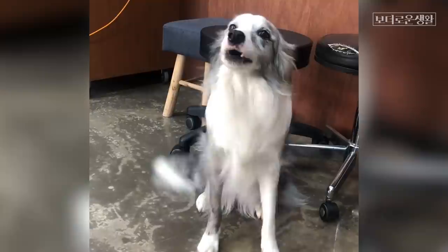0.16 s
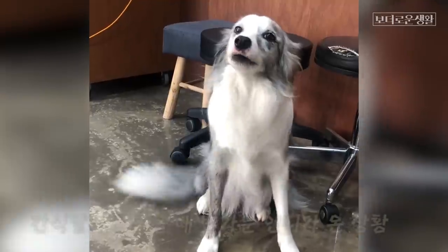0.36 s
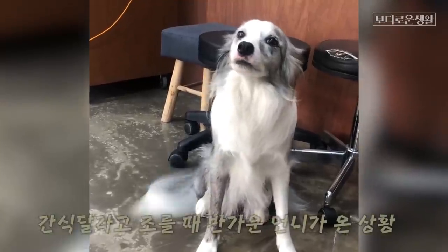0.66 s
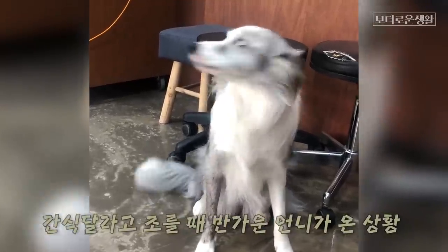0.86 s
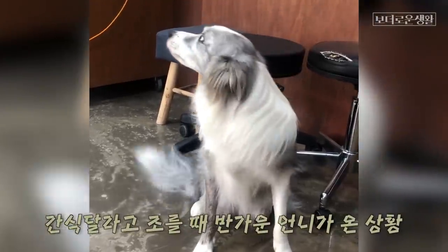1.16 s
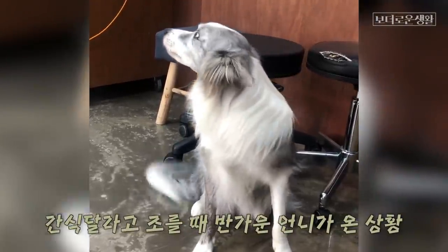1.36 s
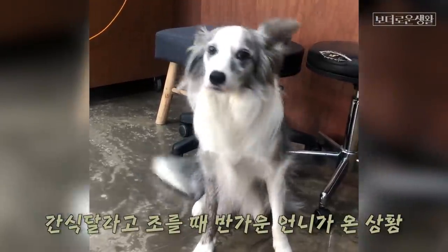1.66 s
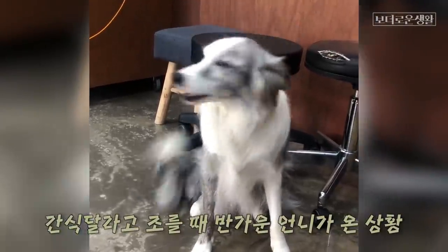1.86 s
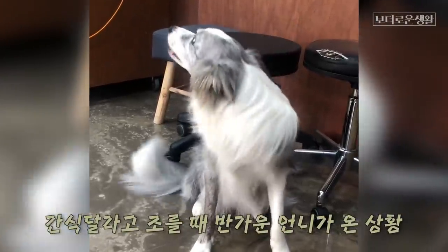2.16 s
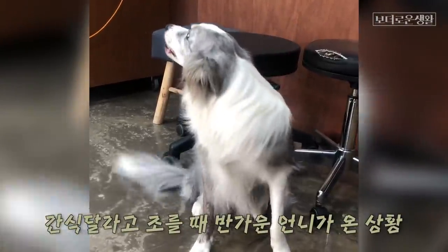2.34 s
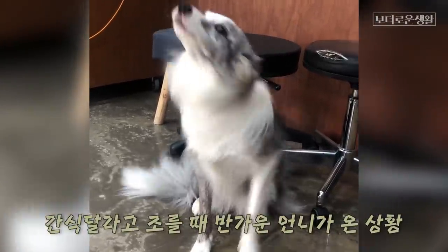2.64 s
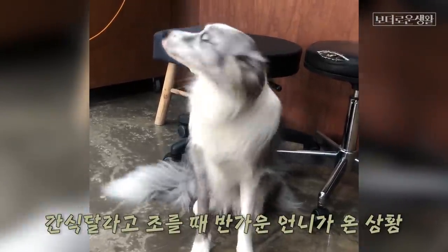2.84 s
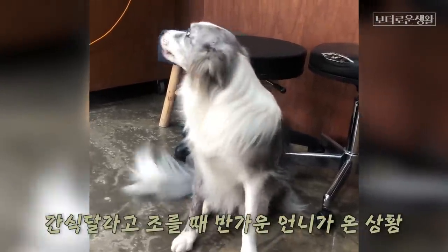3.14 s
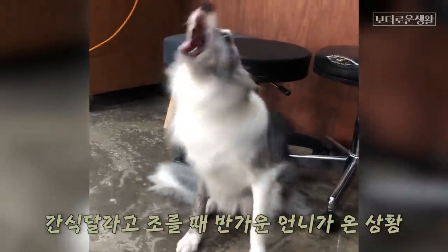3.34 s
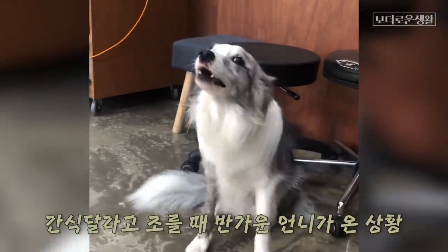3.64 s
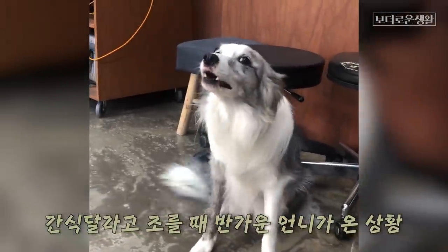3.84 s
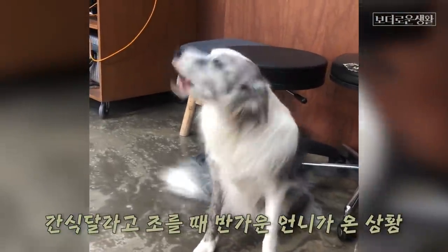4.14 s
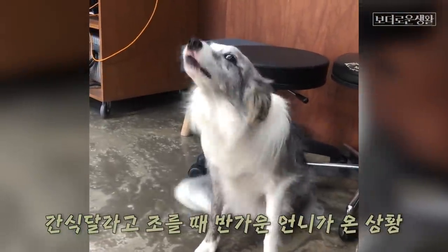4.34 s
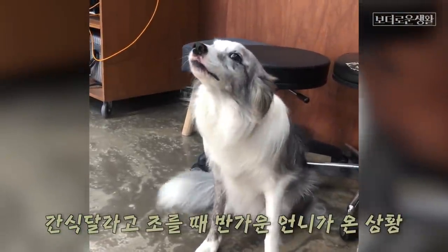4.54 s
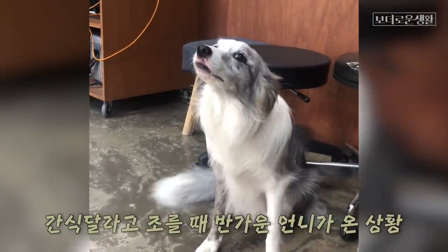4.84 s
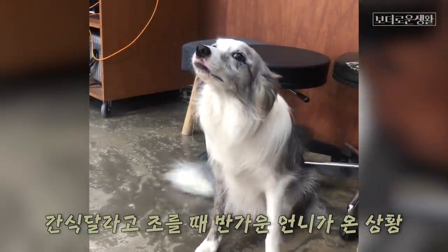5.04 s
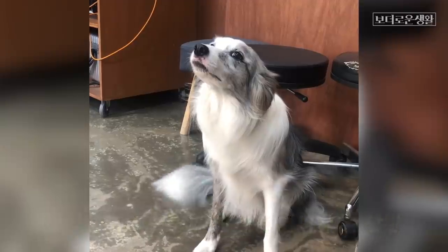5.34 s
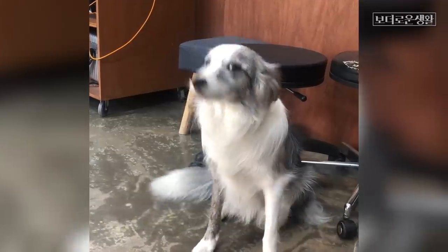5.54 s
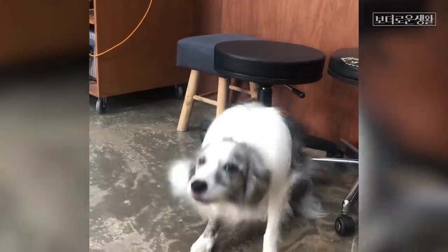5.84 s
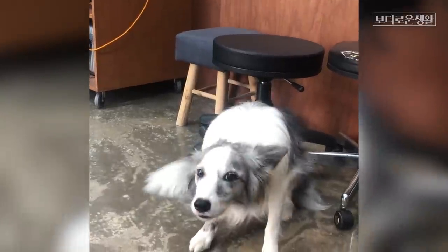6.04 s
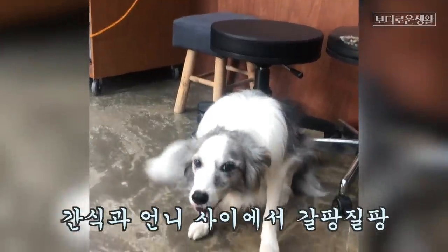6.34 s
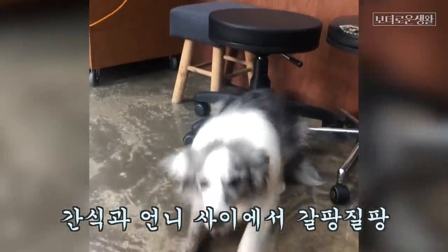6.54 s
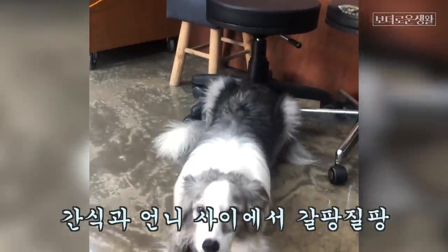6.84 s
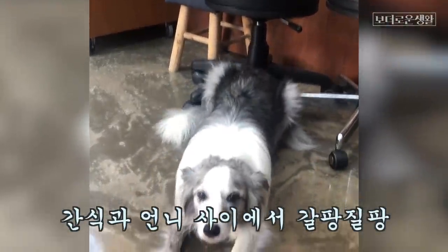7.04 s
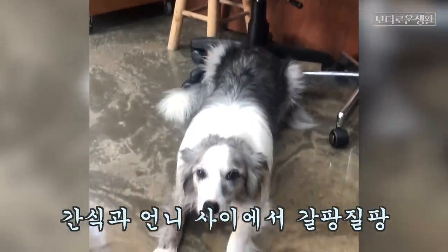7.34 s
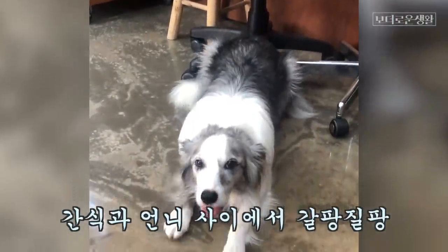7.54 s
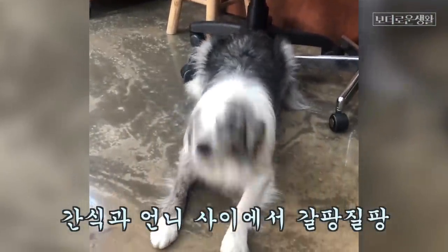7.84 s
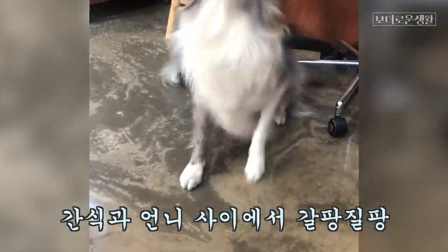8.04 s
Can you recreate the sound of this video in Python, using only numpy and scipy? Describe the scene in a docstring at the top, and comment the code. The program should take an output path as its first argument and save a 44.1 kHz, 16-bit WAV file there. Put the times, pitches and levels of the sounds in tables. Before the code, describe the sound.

Close indoors, a begging dog yelps sharply, whistles thinly through its nose, whimpers, pants and shuffles, then gives a low falling yowl.

```python
"""A room with a hard floor: an excited dog begs close to a phone.
Vocal folds (rough harmonics plus turbulent air) give barks, whines, shut-mouth whimpers and six yelps;
a near-pure whistle, mostly 4-6 kHz, sounds with or between them. Noise bursts make the clicks of jaws
and claws and the panting; decaying low tones make the paw thuds. Shaped noise makes shuffling and hush.
The room rings after each sound; the phone's limiter flattens the loudest peaks."""
import sys
import numpy as np
from scipy import signal
from scipy.fft import rfft, irfft, next_fast_len
from scipy.io import wavfile
from scipy.ndimage import uniform_filter1d, minimum_filter1d, map_coordinates

SR = 44100
rng = np.random.default_rng(int(sys.argv[2]) if len(sys.argv) > 2 else 0)


def transcribe(signal):
    """Save signal, clipped to [-1, 1], as a 16-bit WAV file at the path in sys.argv[1]."""
    frames = np.atleast_2d(signal).T
    limited = np.clip(frames, -1, 1)
    pcm = np.round(limited * 32767).astype(np.int16)
    wavfile.write(sys.argv[1], SR, pcm)


N = 361302

# Low shuffling: t/s, level/dB before trim
SHUFFLE_LEVEL = [(0.0, -65), (0.54, -64.5), (0.95, -57), (2.01, -56.5), (2.55, -70), (3.09, -60.5),
                 (3.34, -51), (3.74, -59.5), (4.06, -54), (4.71, -67), (6.11, -52.5), (6.5, -55),
                 (7.08, -69.5), (8.1, -62.5)]
# Shuffling spectrum: f/Hz, relative density/dB
SHUFFLE_COLOUR = [(20, -29.5), (70, -16), (150, -4), (240, -5), (400, -15.5), (1500, -23), (8000, -71)]
# Room hush spectrum: f/Hz, relative density/dB
HUSH_COLOUR = [(20, -33), (60, -6), (150, -3), (280, -8.5), (400, -15.5), (650, -9), (1200, -19),
               (3000, -18.5), (6000, -25), (15000, -43.5)]
# Barks, folds broken to about 1/2 or 1/3 of their pitch: t/s, length/s, pitch f/Hz, level/dB,
# overtone lift/dB, loudest at/0-1, roughness at end/0-1, dip of a coinciding yelp/dB
BARKS = [(0, 0.12, 504, -43, -9, 0.28, 0.28, 0), (2.114, 0.045, 714, -29, -16, .4, 0.2, 3.5),
         (2.631, 0.054, 465.6, -13, 3, 0.7, 0.01, 7), (3.429, 0.056, 636.7, -4.5, 8.5, .45, 0.29, 9),
         (4.268, .068, 649.2, -4.5, -2.5, .38, .6, 21), (4.283, .026, 780.3, -4.5, -9.5, 0.43, .7, 0.5),
         (6.689, .034, 728.3, -8.5, 8.5, 0.7, .7, 8), (8.168, 0.078, 576.3, -8, -26, .5, 0.71, 0)]
# Bark mouth response: f/Hz, gain/dB
BARK_MOUTH = [(300, -52), (480, -27), (620, -21), (740, -6), (900, -10), (1300, -3.5), (1600, -7.5),
              (1900, 2), (2400, -9.5), (3000, -15), (3800, -16.5), (5000, -37.5), (7200, -30.5),
              (9700, -37.5), (15000, -46.5)]
# Short open-mouth whines: t/s, length/s, start f/Hz, turn f/Hz, end f/Hz, turn at/0-1, loudest at/0-1,
# level/dB, overtone lift/dB, roughness/0-1
WHINES = [(0, .098, 979.6, 1013, 974, 0.45, 0.05, -27.5, 10.5, 0.34),
          (.099, .043, 1054, 1038, 935, 0.48, 0.24, -19.5, -5.5, 0.13),
          (2.76, 0.056, 537.5, 485, 481, 0.98, .15, -30.5, 0, .08),
          (4, 0.036, 1063, 1060, 1018, 0.78, 0.25, -42.5, 2.5, 0.13),
          (4.175, 0.064, 1037, 1078, 1027, 0.96, .7, -42.5, 6, 0.078),
          (5.946, 0.018, 1263, 1092, 850, 0.57, 0.4, -18, -12, 0.12),
          (7.668, .025, 951, 914, 1017, 0.397, 0.73, -24, 14, .2),
          (7.69, 0.034, 1120, 1013, 1150, 0.65, 0.18, -29.5, 10.5, .08)]
# Long yowl, sinking overall: t/s, pitch f/Hz, level/dB, overtone lift/dB before YOWL_LIFT_DB
YOWL = [(7.855, 905, -38, -10), (7.895, 870, -34.5, -12), (7.913, 1045, -22.5, -18),
        (7.935, 822.3, -13.5, 4), (7.955, 904, -12, -1.5), (7.973, 846, -18, -22), (7.989, 846.5, -11, -5),
        (7.999, 792.5, -18.5, -24), (8.009, 624, -16, -26), (8.029, 613, -15.5, -25),
        (8.041, 588.7, -19.5, -16.5), (8.117, 559, -13, -17), (8.139, 602.8, -16, -22.5),
        (8.17, 667, -7.5, -23)]
# Open-mouth whine response: f/Hz, gain/dB
WHINE_MOUTH = [(250, -43), (580, 3.5), (850, -3.5), (1200, -7.5), (1750, -3.5), (2050, -11), (2550, -13),
               (2850, -30.5), (3150, -18.5), (3550, -29.5), (4400, -46), (5400, -47.5), (6300, -28),
               (10000, -31.5), (15000, -71.5)]
# Short whistles: t/s, length/s, start f/Hz, turn f/Hz, end f/Hz, turn at/0-1, loudest at/0-1,
# level/dB, overtone lift/dB
WHISTLES = [(.095, .135, 4180, 4075, 3983, 0.34, .42, -23, -15),
            (.945, 0.041, 5570, 6030, 5560, 0.44, 0.6, -43.5, -3),
            (1.522, .16, 4600, 5000, 3880, .22, 0.71, -31.5, -6),
            (2.572, 0.044, 4760, 4950, 5500, 0.4, 0.52, -39, -15),
            (2.738, 0.048, 5180, 4370, 3740, 0.23, 0.68, -34.5, 9),
            (2.778, .31, 3838, 3930, 3650, 0.9, 0.8, -43, -9),
            (3.545, .17, 3930, 3996, 3970, 0.64, 0.1, -31.5, -12.5),
            (4.415, .225, 3942, 4010, 3720, 0.52, 0.03, -32, -15.5),
            (5.385, 0.074, 12960, 13100, 13200, .5, .5, -61, -20),
            (5.495, .135, 4270, 4960, 4150, .55, .68, -40, -7),
            (5.98, 0.051, 4360, 4200, 3710, .4, 0.2, -32.5, -13.5),
            (6.405, 0.04, 4510, 4740, 4830, .45, 0.62, -52, -23),
            (6.615, 0.016, 4980, 5330, 5400, .7, 0.7, -24, -28),
            (6.715, 0.041, 5500, 5500, 4820, .35, 0.7, -29, -6),
            (7.725, .135, 6120, 4530, 5160, 0.54, 0.6, -33.5, 3)]
# Long whistle, stepping down: t/s, pitch f/Hz, level/dB before trim
LONG_WHISTLE = [(0.988, 6500, -51), (0.996, 6640, -39), (1.014, 5100, -36), (1.028, 5320, -34),
                (1.072, 4440, -39.5), (1.096, 4660, -30.5), (1.146, 4390, -36), (1.18, 4700, -29.5),
                (1.216, 4190, -32), (1.26, 3890, -41.5)]
# Whistle mouth response: f/Hz, gain/dB
WHISTLE_MOUTH = [(3700, -6.5), (5500, -0.5), (8000, -13.5), (10000, -20), (12000, -26), (14000, -28.5),
                 (15500, -42)]
# Jaw and claw clicks: t/s, level/dB before trim
CLICKS = [(0.366, -38), (1.714, -22), (1.921, -22), (3.159, -19), (3.311, -23.5), (3.858, -26.5),
          (4.035, -20)]
# Click spectrum: f/Hz, relative level/dB
CLICK_COLOUR = [(80, -33), (300, 3), (900, -1), (2000, -8), (5000, -14.5), (9000, -27.5), (15000, -35.5)]
# Paws landing: t/s, pitch f/Hz, level/dB
PAWS = [(2.145, 172, -33), (5.939, 192, -39.5), (5.984, 161, -24), (6.03, 128, -37), (6.8, 129, -39)]
# Shut-mouth whimpers: same columns as WHINES
WHIMPERS = [(1.495, 0.14, 711, 788, 752, 0.48, 0.53, -29.5, -5.5, 0.01),
            (1.782, 0.057, 715, 695, 713, 0.5, 0.36, -22, -16, 0),
            (1.945, 0.11, 745.6, 760.5, 790, 0.9, 0.1, -22, -17.5, 0)]
# Closed-lip response: f/Hz, gain/dB
SHUT_MOUTH = [(250, -17), (720, -4), (1500, -3), (2200, -27), (3000, -35), (3800, -18), (5000, -33),
              (9000, -9), (15000, -56.5)]
# Panting puffs: t/s, length/s, level/dB, mouth resonance f/Hz
PUFFS = [(1.716, .085, -34, 1507), (1.913, 0.013, -47, 1500), (3.121, 0.19, -49, 890),
         (3.262, 0.15, -47, 2882), (3.829, 0.059, -43, 1100), (3.993, 0.2, -44, 1883),
         (6.39, 0.25, -44.5, 2275)]
# Puff spectrum at the muzzle: f/Hz, relative level/dB
MUZZLE = [(150, -8.5), (600, -11), (1200, -10), (2000, -9), (2750, -18), (3300, -7), (4500, -19),
          (6000, -23), (8500, -31.5), (15000, -37.5)]
# Yelps: t/s, length/s, start f/Hz, top f/Hz, end f/Hz, pitch time constant/s, swell time constant/s,
# level/dB, fade/dB, overtone lift/dB, roughness at start/0-1, roughness once settled/0-1
YELPS = [(1.998, 0.15, 1033, 1444, 1374, 0.015, .01, 1.5, 21.5, 2.5, 0.5, 0.03),
         (2.59, 0.14, 1667, 1390, 1397, 0.0051, 0.019, 1.5, 12.5, -1, 0, 0),
         (3.384, 0.12, 1145, 1425, 1371, .035, 0.0032, -5.5, 2, 3, 0.05, 0.06),
         (4.233, 0.13, 1359, 1443, 1282, .025, 0.0026, -3, 8, 0, .05, 0.09),
         (5.82, 0.12, 1148, 1444, 1177, 0.02, 0.0064, -2.5, 11.5, 14, .55, 0.14),
         (6.624, .142, 1214, 1400, 1286, .036, 0.0059, 1.5, 14.5, -7, .05, .08)]
# Yelp mouth response: f/Hz, gain/dB
YELP_MOUTH = [(300, -45), (700, -25.5), (1050, -7), (1400, 5), (2000, -2.5), (2750, -13), (4100, -30),
              (5500, -30.5), (7000, -37), (8300, -50), (9700, -31), (11200, -39.5), (13000, -47.5),
              (15500, -67.5)]
# Hiss of air in the nose: f/Hz, relative level/dB
NOSE = [(1000, -19.5), (3500, -11.5), (5200, -11.5), (7000, -6), (9000, -12.5), (11500, -17.5),
        (15000, -29.5)]
# Share of the overtone lift each region gets: f/Hz, share/1
PRESS = [(1200, 0.92), (2800, 0.93), (4200, 1), (9000, 0.51)]
# Muzzle direction: t/s, gain above BEAM_HZ/dB
FACING = [(0, 5.5), (1, 4), (4.9, -1.5), (5.7, 11), (6.9, 8), (7.6, 0)]
# Room decay, apart from the early boost: f/Hz, t60/s
ROOM_T60 = [(120, .35), (500, 0.78), (1300, 0.71), (2800, 0.83), (4200, 0.63), (8000, .45), (14000, .3)]
# Room level against the direct sound: f/Hz, gain/dB
ROOM_GAIN = [(150, -14), (700, -8), (1400, -6), (2800, -12.5), (4200, -7.5), (9000, -8.5), (15000, -26.5)]

TOP_HZ = 15700  # band limit of voices and phone
ATTACK_S = 0.0031  # opening and closing of every call
BEND = 1.5  # glide shape: 1 straight, 2 parabola
CALM_HISS = 0.1  # nose hiss of a clean call, on the roughness scale
BARK_EDGE_DB, BARK_DROOP = 2, 0.032  # loss of level and share of pitch at onset; 0.88 of it at the end
WHINE_EDGE_DB, WHIMPER_EDGE_DB, WHISTLE_EDGE_DB = 8.5, 10, 13.5  # level loss at both ends
YOWL_LIFT_DB, YOWL_ROUGH = 17, 0.1
WHISTLE_BRIGHTEN_DB = 4  # overtone growth, start to end
LONG_WHISTLE_LIFT_DB, LONG_WHISTLE_TRIM_DB = 0, 0.5
SWELL_DB = 26  # a yelp starts this far down
SAG_POWER, FADE_POWER = 3.5, 4.6  # higher: pitch, level give way later
END_ROUGH = .28  # yelp roughness as the breath runs out
STRAIN_DB, STRAIN_S = 13, 0.0056  # overtone growth around a break
BREAK_ROUGH, BREAK_S = 0.22, 0.012  # roughness added within a break; time to break
BEAM_HZ = 8000  # the beam narrows above this


def amp(db):
    """Decibels to gain."""
    return 10 ** (np.asarray(db) / 20)


def unit(x):
    """Scale to rms 1."""
    return x / np.sqrt(np.mean(x ** 2) + 1e-20)


def along(points, hz):
    """Read (Hz, value) points on a log axis."""
    f, v = np.transpose(points)
    return np.interp(np.log(hz + 1), np.log(f + 1), v)


def wobble(size, rate):
    """A smooth random curve with rate knots a second."""
    return map_coordinates(rng.standard_normal(int(size * rate / SR) + 4), [np.arange(size) * rate / SR])


def filtered(x, response):
    """x times a response of frequency."""
    m = next_fast_len(len(x) + 8192)
    return irfft(rfft(x, m) * response(np.fft.rfftfreq(m, 1 / SR)), m)[:len(x)]


def noise(size, colour):
    """Noise of rms 1 with the given (Hz, dB) colour."""
    return unit(filtered(rng.standard_normal(size), lambda hz: amp(along(colour, hz))))


def add(track, s, sound):
    """Mix a sound into the track from time s on."""
    part = track[max(round(s * SR), 0):][:len(sound)]
    part += sound[:len(part)]


def shuffling(trim_db=1, uneven_db=1.0):
    """Weight shifts and tail sweeps on the floor: soft, uneven low noise."""
    level_db = np.interp(np.arange(N) / SR, *np.transpose(SHUFFLE_LEVEL))
    return amp(level_db + trim_db + uneven_db * wobble(N, 10)) * noise(N, SHUFFLE_COLOUR)


def hush(level_db=-61.5):
    """Steady room air: stationary shaped noise."""
    return amp(level_db) * noise(N, HUSH_COLOUR)


def progress(length_s):
    """0 to 1 over a call, one value per sample."""
    return np.linspace(0, 1, max(int(length_s * SR), 64))


def arch(u, at, start, middle, end, bend):
    """Control moving from start to middle, reached at share at, then to end."""
    at = np.clip(at, .02, .98)
    before = (start - middle) * np.abs(1 - u / at) ** bend
    after = (end - middle) * np.abs((u - at) / (1 - at)) ** bend
    return middle + np.where(u < at, before, after)


def gate(size):
    """Soft sine-squared opening and closing of a call."""
    k = np.arange(size)
    edge_distance = np.minimum(k, k[::-1])
    return np.sin(np.pi / 2 * np.clip(edge_distance / (ATTACK_S * SR), 0, 1)) ** 2


def controls(rows):
    """Start time and smoothed per-sample controls of a long call."""
    s, *columns = np.transpose(rows)
    s = np.sort(s)
    t = np.arange(s[0], s[-1], 1 / SR)
    return [s[0]] + [uniform_filter1d(np.interp(t, s, column), size=256) for column in columns]


def glides(rows, edge_db):
    """Short calls: pitch bends through one turn while level swells and fades."""
    for s, length_s, start_hz, turn_hz, end_hz, turn_at, loudest_at, peak_db, *colour in rows:
        u = progress(length_s)
        pitch_hz = arch(u, turn_at, start_hz, turn_hz, end_hz, BEND)
        level_db = peak_db + arch(u, loudest_at, -edge_db, 0, -edge_db, 2.2)
        yield s, pitch_hz, level_db, *colour


def harmonics(pitch_hz, lift_db, mouth, flicker_db, count):
    """Harmonic tone of rms 1 shaped by the mouth; pressing harder lifts the overtones."""
    k = np.arange(1, count + 1)[:, None]
    hz = k * pitch_hz
    # jaw and tongue never rest: each overtone fades by itself, high ones most
    drift = np.minimum([wobble(len(pitch_hz), 70) for _ in k], .5)
    flicker = flicker_db * np.minimum(hz / 4000, 1) * drift
    overtone_db = (k > 1) * (lift_db * along(PRESS, hz) + flicker)
    gain = amp(along(mouth, hz) + overtone_db) * (hz < TOP_HZ)
    phase = 2 * np.pi * (k * np.cumsum(pitch_hz) / SR + rng.random((count, 1)))
    rms = np.sqrt(np.sum(gain ** 2, 0) / 2 + 1e-20)
    return np.sum(gain * np.sin(phase), 0) / rms


def folds(calls, mouth, jitter, lurch, shimmer_db, rasp, flicker_db, hiss_db, count):
    """Vocal folds: roughness shakes pitch and level and lets turbulent air through."""
    out = np.zeros(N)
    for s, pitch_hz, level_db, lift_db, rough in calls:
        n, rough = len(pitch_hz), np.clip(rough, 0, 1)
        # fast jitter, slower lurches, slight quiver even when clean
        shake = rough * (jitter * wobble(n, 450) + lurch * wobble(n, 109.1)) + 0.0039 * wobble(n, 80)
        pitch_hz = pitch_hz * (1 + shake)
        shimmer = amp(shimmer_db * rough * wobble(n, 350))
        tone = harmonics(pitch_hz, lift_db, mouth, flicker_db, count) * shimmer
        # escaping air pulses once a cycle
        pulse = 1 + 0.16 * np.cos(2 * np.pi * np.cumsum(pitch_hz) / SR)
        air = unit(noise(n, BARK_MOUTH) * pulse)
        share = np.clip(rasp * rough, 0, 1)
        hiss = (rough + CALM_HISS) * amp(hiss_db) * noise(n, NOSE)
        voice = np.sqrt(1 - share ** 2) * tone + share * air + hiss
        add(out, s, gate(n) * amp(level_db) * voice)
    return out


def bark_calls(first_rough_share=0.68):
    """Pitch and level rise and fall together; roughness grows throughout."""
    for s, length_s, top_hz, peak_db, lift_db, loudest_at, end_rough, _ in BARKS:
        u = progress(length_s)
        slack = arch(u, loudest_at, 1, 0, 0.88, 1.3)
        rough = end_rough * arch(u, loudest_at, first_rough_share, 0.88, 1, 0.84)
        yield s, top_hz * (1 - BARK_DROOP * slack), peak_db - BARK_EDGE_DB * slack, lift_db, rough


def barks():
    """Rough, low-pitched fold cycles through the bark mouth."""
    return folds(bark_calls(), BARK_MOUTH, jitter=.08, lurch=.1, shimmer_db=7, rasp=.55,
                 flicker_db=4, hiss_db=-26, count=28)


def whines():
    """Short whines and the long yowl: folds through an open mouth."""
    s, pitch_hz, level_db, treble_db = controls(YOWL)
    yowl = (s, pitch_hz, level_db, treble_db + YOWL_LIFT_DB, YOWL_ROUGH)
    calls = [*glides(WHINES, WHINE_EDGE_DB), yowl]
    return folds(calls, WHINE_MOUTH, jitter=.04, lurch=.05, shimmer_db=4, rasp=.35,
                 flicker_db=8, hiss_db=-17, count=24)


def whistles(waver=0.0066, flutter_db=3.5, hiss_db=-27):
    """Second voice: near-pure, slightly wavering whistle with a little hiss."""
    out = np.zeros(N)
    s, pitch_hz, level_db = controls(LONG_WHISTLE)
    long_call = (s, pitch_hz, level_db + LONG_WHISTLE_TRIM_DB, LONG_WHISTLE_LIFT_DB)
    for s, pitch_hz, level_db, lift_db in [long_call, *glides(WHISTLES, WHISTLE_EDGE_DB)]:
        n = len(pitch_hz)
        lift_db = lift_db + WHISTLE_BRIGHTEN_DB * np.linspace(-.5, .5, n)
        wavering_hz = pitch_hz * (1 + waver * wobble(n, 90))
        tone = harmonics(wavering_hz, lift_db, WHISTLE_MOUTH, flicker_db=1.0, count=3)
        level = amp(level_db + flutter_db * wobble(n, 80))
        add(out, s, gate(n) * level * (tone + amp(hiss_db) * noise(n, NOSE)))
    return out


def clicks(t60_s=0.045, trim_db=-10, rise_s=0.00076):
    """Jaws and claws: dry, fast-decaying noise bursts."""
    out, t = np.zeros(N), np.arange(SR // 4) / SR
    for s, level_db in CLICKS:
        envelope = amp(level_db + trim_db - 60 * t / t60_s) * (1 - np.exp(-t / rise_s))
        add(out, s, envelope * noise(len(t), CLICK_COLOUR))
    return out


def whimpers():
    """Folds behind closed lips."""
    return folds(glides(WHIMPERS, WHIMPER_EDGE_DB), SHUT_MOUTH, jitter=.06, lurch=.035, shimmer_db=2,
                 rasp=.3, flicker_db=8, hiss_db=-3, count=7)


def panting(width_hz=260, resonance_db=13):
    """Puffs of air through the muzzle, each coloured by the mouth's resonance."""
    out = np.zeros(N)
    for s, length_s, level_db, mouth_hz in PUFFS:
        n = int(length_s * SR)
        air = filtered(noise(n, MUZZLE),
                       lambda hz: amp(resonance_db / (1 + ((hz - mouth_hz) / width_hz) ** 2)))
        add(out, s, amp(level_db) * signal.windows.tukey(n, .9) * unit(air))
    return out


def yelp_calls(settled_at=.4):
    """Pitch moves fast to the top, holds and sags; a yelp strains around a bark and gives way to it."""
    for (s, length_s, start_hz, top_hz, end_hz, rise_s, swell_s, peak_db, fade_db, lift_db,
         first_rough, settled_rough) in YELPS:
        u = progress(length_s)
        t = u * length_s
        pitch_hz = top_hz + (start_hz - top_hz) * np.exp(-t / rise_s) + (end_hz - top_hz) * u ** SAG_POWER
        level_db = peak_db - SWELL_DB * np.exp(-t / swell_s) - fade_db * u ** FADE_POWER
        rough = arch(u, settled_at, first_rough, settled_rough, END_ROUGH, bend=5.2)
        for bark_s, bark_length_s, *_, dip_db in BARKS:
            # seconds inside the bark, negative outside
            inside_s = np.minimum(s + t - bark_s, bark_s + bark_length_s - s - t)
            broken = np.clip(inside_s / BREAK_S, 0, 1)
            level_db = level_db - dip_db * broken
            rough = rough + BREAK_ROUGH * broken
            lift_db = lift_db + STRAIN_DB * np.exp(np.minimum(inside_s, 0) / STRAIN_S)
        yield s, pitch_hz, level_db, lift_db, rough


def yelps():
    """Piercing, high-pitched fold cycles through the yelp mouth."""
    return folds(yelp_calls(), YELP_MOUTH, jitter=.08, lurch=.05, shimmer_db=6, rasp=.7,
                 flicker_db=5, hiss_db=-24, count=13)


def paws(t60_s=0.18, rise_s=0.0061):
    """Padded paws: soft, low decaying tone plus low noise."""
    out, t = np.zeros(N), np.arange(SR // 4) / SR
    colour = [(40, -35.5), (150, -5), (300, -15), (1500, -33.5), (6000, -67)]  # f/Hz, relative level/dB
    for s, pitch_hz, level_db in PAWS:
        thud = np.sin(2 * np.pi * pitch_hz * t) + .5 * noise(len(t), colour)
        add(out, s, amp(level_db - 60 * t / t60_s) * (1 - np.exp(-t / rise_s)) * thud)
    return out


def beamed(x):
    """The muzzle beams its treble, which comes and goes as the muzzle turns."""
    facing_db = np.interp(np.arange(N) / SR, *np.transpose(FACING))
    treble = filtered(x, lambda hz: 1 - 1 / (1 + (hz / BEAM_HZ) ** 10))
    return x + (amp(facing_db) - 1) * treble


def room(x, build_up_s=0.011, early_db=6, early_s=0.12):
    """Strong early echoes from floor and near walls, then decay at each frequency's own speed."""
    hz, t, z = signal.stft(rng.standard_normal(SR), SR, nperseg=256)
    decay_db = -60 * t / along(ROOM_T60, hz)[:, None] + early_db * np.exp(-t / early_s)
    decay = amp(decay_db) * (1 - np.exp(-t / build_up_s))
    decay /= np.sqrt(np.mean(decay ** 2, axis=1, keepdims=True) * SR)
    gain = amp(along(ROOM_GAIN, hz))[:, None]
    tail = signal.istft(z * decay * gain, SR, nperseg=256)[1]
    return signal.fftconvolve(x, tail)[:N]


def echoes(x, count=12):
    """Room echo whose pattern drifts steadily: crossfades through count random tails."""
    place = np.linspace(0, count - 1, N)
    return sum(room(x * np.cos(np.pi / 2 * np.clip(place - k, -1, 1))) for k in range(count))


def scene():
    """Dog, its echoes, room hush and shuffling."""
    voices = barks() + whines() + whistles() + whimpers() + yelps()
    dog = beamed(voices + clicks() + panting() + paws())
    return (dog + echoes(dog) + hush() + shuffling())[None]


def record(dry, ceiling=0.91, release_db_per_s=90):
    """Phone limiter ducks at once, recovers steadily; then a cut at the band limit."""
    x = dry[0]
    need_db = 20 * np.log10(np.minimum(1, ceiling / (np.abs(x) + 1e-9)))
    need_db = minimum_filter1d(need_db, size=129)
    recovery_db = release_db_per_s * np.arange(N) / SR
    held_db = np.minimum.accumulate(need_db - recovery_db) + recovery_db
    gain_db = uniform_filter1d(held_db, size=129)
    return filtered(x * amp(gain_db), lambda hz: hz < TOP_HZ)[None]


dry = scene()
out = record(dry)
transcribe(out)
```